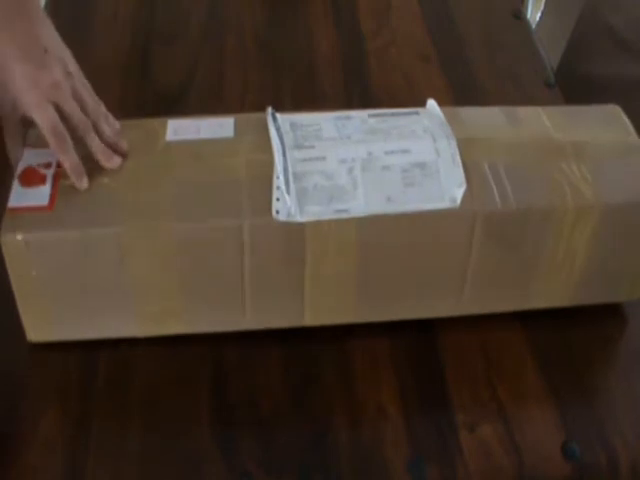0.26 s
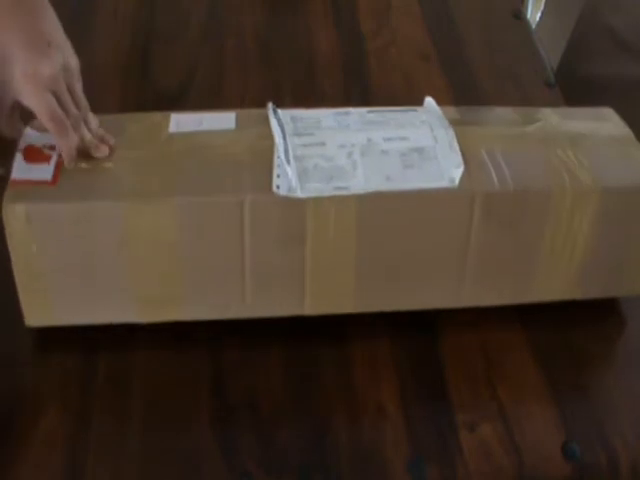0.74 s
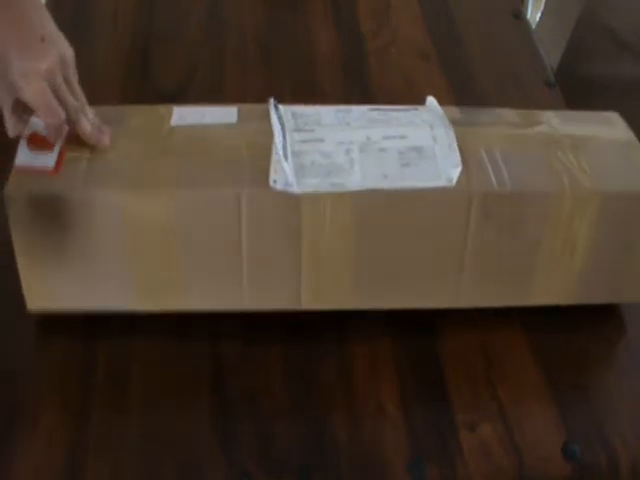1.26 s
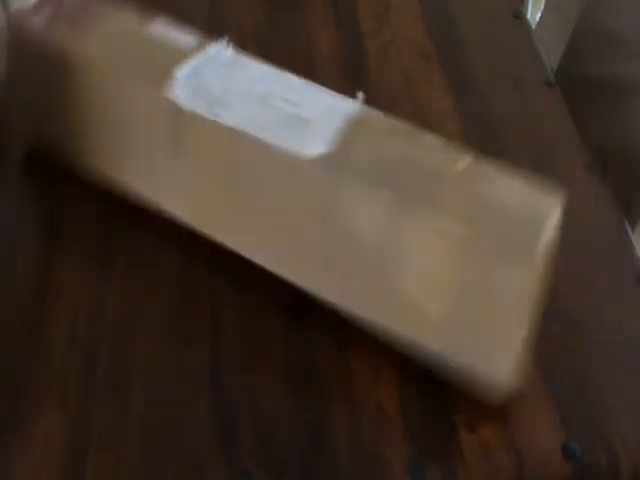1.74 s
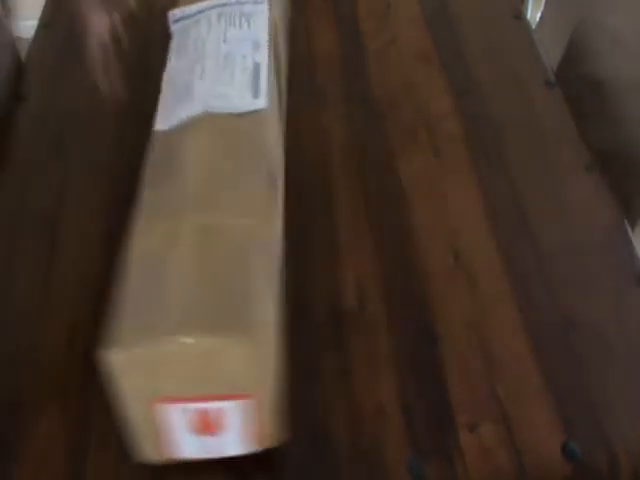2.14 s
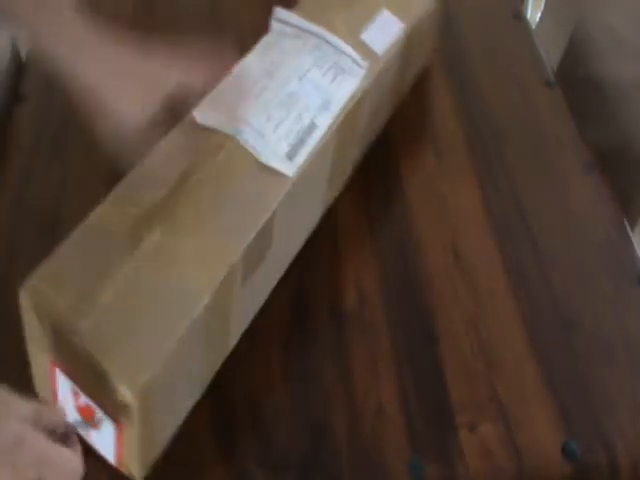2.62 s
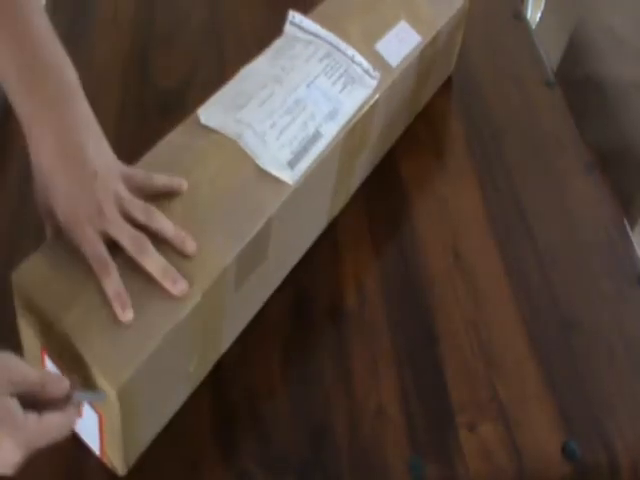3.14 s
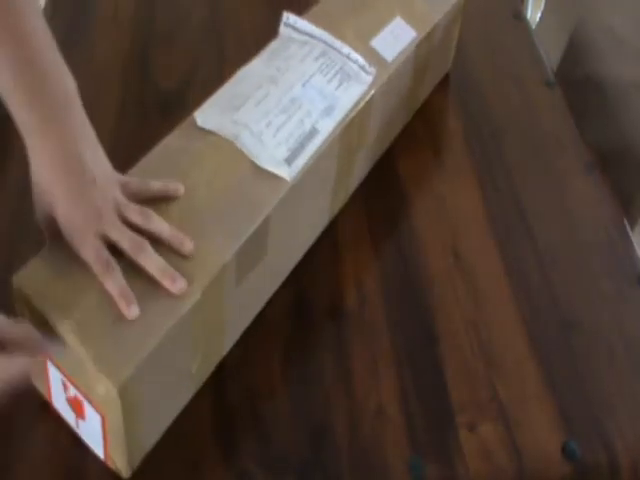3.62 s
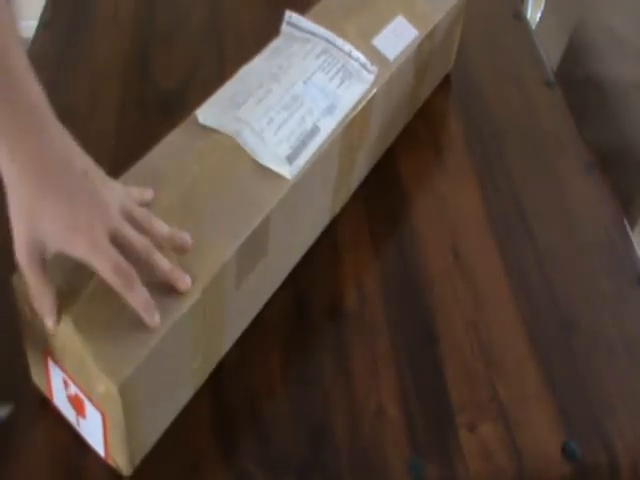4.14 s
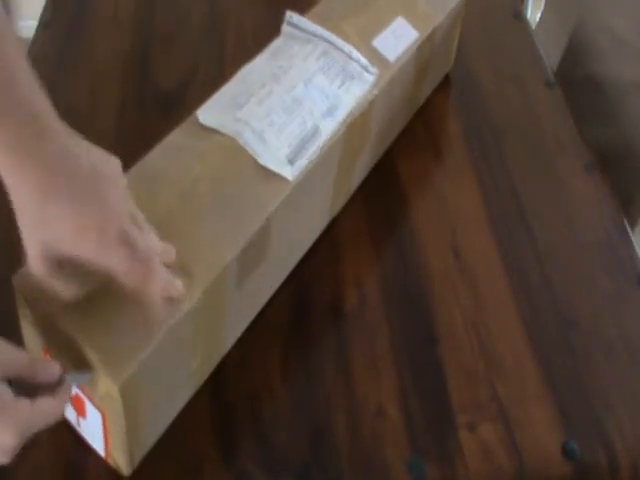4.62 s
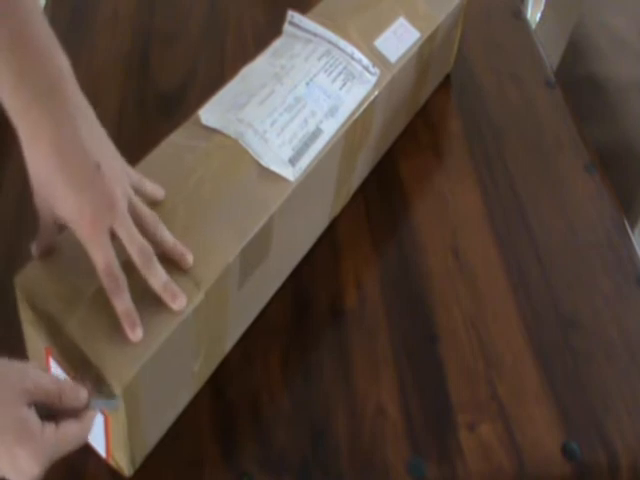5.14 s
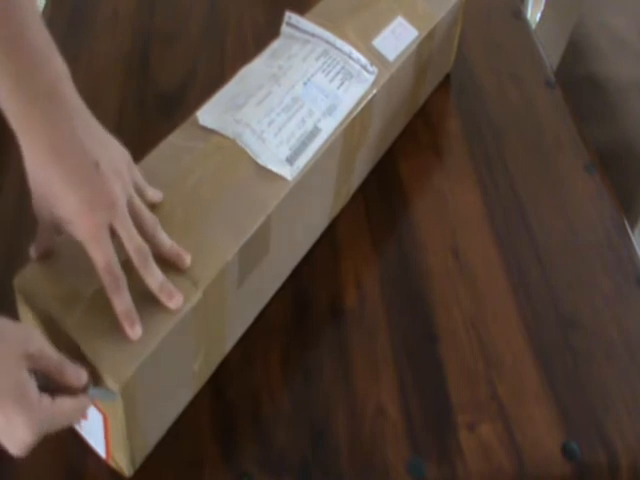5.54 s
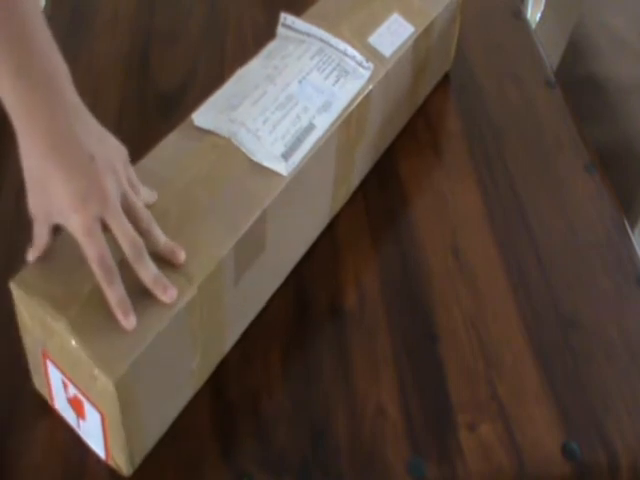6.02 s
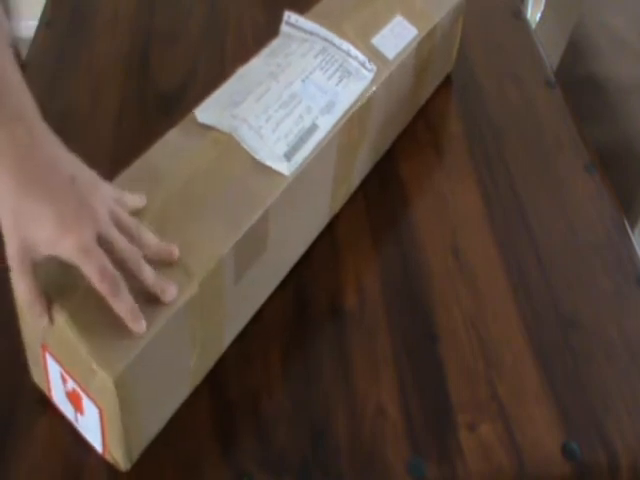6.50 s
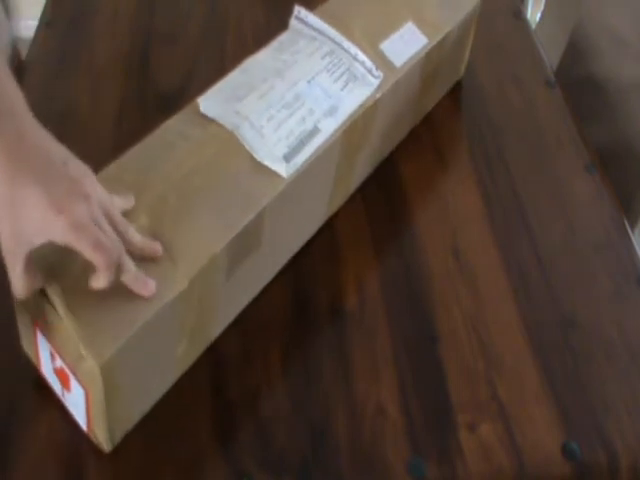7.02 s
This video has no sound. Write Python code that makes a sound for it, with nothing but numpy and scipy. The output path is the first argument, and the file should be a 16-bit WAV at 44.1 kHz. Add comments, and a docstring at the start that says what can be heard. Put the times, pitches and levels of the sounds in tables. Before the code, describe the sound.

A blade picks and rips packing tape on a cardboard box, with sharp snaps, hollow knocks and a slide across a wooden table.

```python
"""A long cardboard parcel is opened on a wooden table in a small, hard, faintly humming room.
First a blade picks at the taut packing tape, which snaps and scrapes. At 1 s a short rip crackles by
stick-slip, and its jerks make the hollow box drone. The box is swung round, hissing and juddering on the
wood, and set down with a knock. A second rip follows at 3.5 s and a third at 5.7 s, where the blade
springs free and twangs. At 7 s a flap pops loose."""
import sys
import numpy as np
from scipy import signal
from scipy.fft import rfft, irfft, next_fast_len
from scipy.io import wavfile
from scipy.ndimage import map_coordinates

SR = 44100
rng = np.random.default_rng(int(sys.argv[2]) if len(sys.argv) > 2 else 0)


def int16_out(signal):
    """Quantize to a 16-bit WAV file."""
    q = np.round(np.clip(np.atleast_2d(signal).T, -1, 1) * 32767)
    wavfile.write(sys.argv[1], SR, q.astype(np.int16))


N = 320166
TIME = np.arange(N) / SR

# Ripping strokes, with levels relative within each layer and the gliding resonance of the freed strip:
# start_s, length_s, crackle_db, wall_db, cavity_db, stall_db, swell_db, drone_hz, first_hz, last_hz
RIP_STROKES = [(1.05, 0.110, -25.5, -26, -20, 1, 5.5, 199, 10000, 8500),
               (3.54, 0.21, -24, -26, -25.5, 1.5, 4.5, 189, 6900, 3600),
               (5.734, 0.245, -24.5, -26, -26.5, 13.5, 6.5, 145, 4500, 4500)]
# Tape snapping as it is picked, bitten or freed: start_s, peak_db, resonance_hz, spray_db
TAPE_SNAPS = [(0.1057, -14.5, 8600, -19), (0.123, -20.5, 9000, 2), (0.2651, -11, 7260, -19),
              (0.388, -26.5, 2340, 2), (0.4763, -9, 5100, -15), (0.496, -32, 6070, 3),
              (0.522, -17.5, 10000, -8), (0.613, -24, 6660, -14), (0.7917, -18, 6000, -3),
              (0.9768, -17.5, 8400, -20), (1.0568, -10.5, 5200, 4), (1.0888, -9.5, 8540, -12),
              (1.165, -13, 5800, -8), (1.741, -15, 3040, 4), (1.8254, -12.5, 6900, -10.5),
              (3.171, -33, 4800, -6), (3.4259, -26.5, 6650, -18), (3.499, -13.5, 7240, 0),
              (3.546, -9, 3080, 0), (3.7641, -9, 3540, 15), (4.137, -35, 3940, -7),
              (4.2888, -12, 3610, -24.5), (4.4302, -12.5, 3600, -13), (4.672, -28.5, 2500, -12),
              (4.801, -30.5, 6000, -10), (4.9166, -26.5, 4500, -19), (5.704, -22, 6950, -9),
              (5.736, -26, 4000, 0), (5.771, -7.5, 6700, -16), (5.845, -7, 2500, 0), (6.01, -12, 3020, 1),
              (6.021, -21, 2640, -6), (6.032, -14.5, 2700, -1), (6.2395, -28.5, 7750, -13),
              (6.358, -32, 4900, -23), (6.393, -33.5, 1500, -10), (7.0144, -14.5, 1410, 12),
              (7.248, -28, 9370, -18)]
# Blade dragged over taut tape: start_s, length_s, level_db, resonance_hz
BLADE_SCRAPES = [(0.12, 0.071, -43.5, 8900), (0.487, 0.018, -34, 5840), (0.757, 0.2, -38.5, 5300),
                 (2.382, 0.083, -35.5, 4600), (2.664, 0.033, -41.5, 4640), (3.179, 0.03, -47.5, 5400),
                 (3.51, 0.031, -40, 7360), (3.698, 0.057, -28.5, 4050), (4.531, 0.051, -42, 1780),
                 (5.857, 0.092, -30, 4570), (6.675, 0.01, -47, 4240)]
# Blade springing free: start_s, gain_db
BLADE_TWANGS = [(5.739, -37.5), (6.012, -40), (6.021, -30.5)]
# Knocks on the panels of the box: start_s, level_db, pitch_hz, t60_s, relative_rattle_db
BOX_KNOCKS = [(0.032, -16.5, 175, 0.018, -19), (0.034, -28, 620, 0.016, -22),
              (0.977, -29.5, 357, 0.036, -7), (1.091, -10.5, 350, 0.019, -24),
              (1.117, -15.5, 220, 0.1, -22), (1.163, -11.5, 220, 0.049, -12),
              (1.570, -20.5, 190, 0.025, -25), (1.704, -9, 232, 0.018, -26), (1.741, -8, 470, 0.011, -15.5),
              (1.956, -26, 140.5, 0.36, -22), (2.2652, -4.5, 244, 0.022, -40),
              (2.269, -16.5, 477, 0.091, -19), (2.284, -11, 393, 0.057, -15),
              (2.325, -13.5, 304, 0.05, -21), (3.696, -22, 119, 0.1, -22), (3.717, -17.5, 330, 0.11, -19),
              (3.985, -22, 540, 0.0048, -21), (4.287, -25, 510, 0.026, -17), (4.301, -26, 450, 0.12, -7),
              (4.427, -27.5, 603, 0.023, -15), (4.548, -19, 200, 0.031, -10),
              (4.648, -18.5, 375, 0.006, -24), (4.697, -19.5, 292, 0.01, -17),
              (5.845, -19.5, 1010, 0.058, -12), (6.011, -10.5, 270, 0.021, -22),
              (6.03, -21, 400, 0.047, -23), (6.392, -28.5, 634, 0.015, -9), (6.586, -20, 300, 0.041, -13),
              (7.0135, -7, 352.6, 0.084, -15.5), (7.032, -10, 285, 0.028, -16),
              (7.05, -22, 760, 0.023, -14)]
# Level of the friction hiss, from the box sliding and then a hand rubbing it: time_s, level_db
FRICTION_LEVEL = [(1.47, -54), (1.55, -36.5), (1.734, -35), (1.738, -32), (2.156, -41.5), (2.3, -39.5),
                  (2.346, -41.5), (2.42, -33.5), (2.534, -41.5), (2.692, -44), (3.0, -59)]
# Edge of the box catching on the wood: start_s, length_s, relative_db
EDGE_JUDDERS = [(1.695, 0.059, -20), (1.932, 0.1, -32), (2.137, 0.022, -33)]
# Hand brushing over tape and card: start_s, length_s, relative_db
HAND_RUBS = [(0.0, 0.068, -40.5), (0.285, 0.53, -45.5), (0.815, 0.23, -48), (1.031, 0.03, -31),
             (1.243, 0.32, -44.5), (3.13, 0.041, -52), (3.843, 0.15, -46), (4.12, 0.11, -50.5),
             (4.529, 0.18, -43.5), (6.567, 0.014, -40.5), (6.446, 0.64, -52.5), (7.008, 0.011, -36.5)]

# Normal modes of box and blade: pitch_hz, relative_db, t60_s
BOX_MODES = [(91.5, -21, .10), (137.2, -10, 0.21), (179, -41, 0.69), (212.7, -2, 0.089), (275.5, -1, 0.068),
             (331, 2.5, 0.068), (392, 5, 0.056), (459.4, 0, 0.13), (590, 7.5, 0.026), (717, 0, 0.016),
             (840, -12, 0.076), (1132, 1.5, 0.032), (1392, -6.5, 0.071), (1854, -4, 0.079),
             (2250, -43, .04)]
BLADE_MODES = [(2070, -18, 0.11), (2250, -1, 0.092), (2290, 5.5, 0.063), (2470, -1, 0.11), (2560, 1, 0.11),
               (2760, -9, 0.17), (2950, -4, 0.17), (3000, -13, 0.14)]
# Spectral shapes of the noises: frequency_hz, relative_db
TAPE_SPECTRUM = [(400, -27.5), (900, 10), (1500, 8.5), (2300, 5.5), (3100, 2), (4700, 2), (7000, 2),
                 (10000, 0.5), (13000, -2.5), (16000, -12)]
SNAP_SPECTRUM = [(300, 0.5), (1200, 10), (3000, 5), (5000, 7), (8500, 7.5), (12000, 6.5), (16000, -2)]
FRICTION_SPECTRUM = [(400, -19), (1000, -1.5), (1800, -1), (3000, -2.5), (5000, -1), (9000, -1.5),
                     (13000, -5), (16000, -14)]
RUMBLE_SPECTRUM = [(40, -23), (80, -14.5), (130, 1), (190, -2.5), (280, 3), (450, -2), (700, -8),
                   (1200, -27.5), (2500, -74)]
SKIN_SPECTRUM = [(200, 15), (1200, 4), (2600, 1), (4500, 2.5), (6500, 0.5), (9500, 1), (13000, -5),
                 (16000, -7.5)]
AIR_SPECTRUM = [(18, -21), (31, -38), (48, -26), (70, -6), (130, -3.5), (175, -5.5), (230, -4.5), (335, -4),
                (520, -8.5), (1000, -15), (1900, -25), (2500, -22.5), (3400, -30), (16000, -37)]

# First echo off a near hard surface, shifting as the hands move: time_s, delay_s
ECHO_PATH = [(0.5, .0079), (3.5, .0084), (4.3, .00805), (4.5, .00805), (5.8, .0084)]
# Reverberation time of the room: frequency_hz, t60_s
ROOM_DECAY = [(100, 0.23), (300, 0.59), (1000, 0.37), (2500, 0.57), (6000, 0.43), (14000, 0.22)]
# Stereo width of the reverberation and of the rush of air: frequency_hz, side_to_mid_db
TAIL_SPREAD = [(250, -13), (1000, -4), (12000, -1)]
AIR_SPREAD = [(60, -32), (180, -26), (550, -10.5), (1650, -2), (4970, -3.5), (15000, -5)]
# Phase between the two microphone ports: frequency_hz, left_lead_rad
LEFT_LEAD = [(50, .7), (130, 1.0), (340, 1.0), (650, .7), (1500, .25), (8000, .18), (13000, .4)]
# Balance between the ports: frequency_hz, left_to_right_db
LEFT_BALANCE = [(60, -6), (110, -0.5), (200, -0.5), (380, -0.11), (700, 0.5), (1290, -0.5), (2380, 0.3),
                (4400, 0.82), (8120, 0.59), (15000, 3)]
# Hum and faint whine in the room: pitch_hz, rms_db
HUM_TONES = [(47.5, -56), (176, -60), (2519, -69.5), (3149, -80)]


def tape_rips(tape_mix_db=-3.5, wall_mix_db=-1.5, cavity_mix_db=-2.5):
    """Forced vibration: the jerks of the parting tape drive the strip, the walls and the air inside."""
    force = stick_slip(per_s=2200, spread_db=4, clump_db=2, clumps_per_s=260, hiss_db=-3.5)
    box = ring(BOX_MODES)
    drone, tape_drive, wall_drive, glide = 0, 0, 0, []
    for (start, length, crackle_db, wall_db, cavity_db,
         stall_db, swell_db, drone_hz, first_hz, last_hz) in RIP_STROKES:
        # a stroke bites at once, stalls for a moment, runs on and dies away
        progress = (TIME - start) / length
        stall = np.exp(-((progress - 0.17) / 0.082) ** 2)
        pull = gesture(start, length, attack_s=0.0041, t60_s=0.25) * from_db(-stall_db * stall)
        tape_drive += from_db(tape_mix_db + crackle_db) * pull
        wall_drive += from_db(wall_mix_db + wall_db) * pull
        # the cavity swells as the slit opens
        still_shut = np.clip(1 - progress, 0, 1)
        cavity_drive = from_db(cavity_mix_db + cavity_db - swell_db * still_shut ** 2) * pull
        drone += through(force * cavity_drive, unit_energy(band(box, drone_hz, octaves=0.81)))
        glide += [(start, first_hz), (start + length, last_hz)]
    rasp = strip_rasp(force, strip_hz=at_times(glide))
    crackle = through(rasp * tape_drive, colour(TAPE_SPECTRUM))
    walls = through(force * wall_drive, unit_energy(band(box, hz=710, octaves=2)))
    return crackle + walls + drone


def stick_slip(per_s, spread_db, clump_db, clumps_per_s, hiss_db):
    """Stick-slip friction: clumps of tiny, uneven releases over smooth hiss give a force of rms 1."""
    sizes = from_db(spread_db * np.minimum(rng.exponential(1, N), 4)) * rng.choice([-1, 1], N)
    releases = sizes * (rng.random(N) < per_s / SR)
    force = releases / releases.std() + from_db(hiss_db) * rng.standard_normal(N)
    force *= from_db(clump_db * drift(clumps_per_s))
    return force / force.std()


def strip_rasp(force, strip_hz, resonance_db=1.5, width_octaves=0.9, flutter_db=1.5, flutter_per_s=45):
    """Variable resonance: a broad peak glides with the free strip, and the bands flutter as it flexes."""
    size = next_fast_len(N)
    spectrum, hz = rfft(force, size), np.fft.rfftfreq(size, 1 / SR)
    centres_hz = np.geomspace(800, 15000, 16)
    out = np.zeros(N)
    for centre_hz, share in zip(centres_hz, np.eye(len(centres_hz))):
        part = irfft(spectrum * at_hz(np.c_[centres_hz, share], hz), size)[:N]
        nearness = np.exp(-(np.log2(centre_hz / strip_hz) / width_octaves) ** 2)
        out += part * from_db(resonance_db * nearness + flutter_db * drift(flutter_per_s))
    return out


def tape_snaps(resonance_db=10, spray_t60_s=0.009, size=1500):
    """Sudden release of tension: taut film clicks and sprays small cracks through a broad resonance."""
    out, tick = np.zeros(N), colour(SNAP_SPECTRUM)
    for start, peak_db, hz, spray_db in TAPE_SNAPS:
        cracks = from_db(spray_db - 60 * TIME[:size] / spray_t60_s) * rng.standard_normal(size)
        cracks[0] = 1  # the leading click
        cracks += from_db(resonance_db) * band(cracks, hz, octaves=0.99, order=1)
        snap = signal.fftconvolve(cracks, tick)[:size]
        add(out, start, from_db(peak_db) * snap / np.abs(snap).max())
    return out


def blade_scrapes():
    """Resonant filtering: fine slips of the blade swell and fade in one resonance of the tape."""
    out = np.zeros(N)
    force = stick_slip(per_s=3000, spread_db=0, clump_db=5, clumps_per_s=120, hiss_db=6)
    for start, length, level_db, hz in BLADE_SCRAPES:
        first, size = round(start * SR), round(length * SR)
        scrape = band(force[first:first + size], hz, octaves=0.69, order=1)
        swell = np.sin(np.linspace(0, np.pi, size))
        add(out, start, from_db(level_db) * swell * scrape / scrape.std())
    return out


def blade_twangs():
    """Free vibration: the thin blade rings in its modes when the tape lets it go."""
    out = np.zeros(N)
    for start, gain_db in BLADE_TWANGS:
        add(out, start, from_db(gain_db) * ring(BLADE_MODES))
    return out


def box_knocks(body_db=-7.5, rattle_t60_s=0.11, size=12000):
    """Impact excitation: a struck panel swings, stirs nearby box modes and rattles flaps and tape."""
    thuds, rattle = np.zeros((2, N))
    box, t = ring(BOX_MODES), TIME[:size]
    for start, level_db, hz, t60_s, rattle_db in BOX_KNOCKS:
        panel = np.sin(2 * np.pi * hz * t) * from_db(-60 * t / t60_s)
        panel = high_pass(panel, hz / 4)  # a panel radiates little far below its own pitch
        body = band(box, hz, octaves=2.33)
        add(thuds, start, from_db(level_db) * (panel + from_db(body_db) * body / np.abs(body).max()))
        rattle_decay = from_db(level_db + rattle_db - 60 * t / rattle_t60_s)
        add(rattle, start, rattle_decay * rng.standard_normal(size))
    return thuds + band(rattle, hz=1760, octaves=1.07, order=1)


def box_friction(rumble_db=-3.5):
    """Sliding friction: card hisses and rumbles on wood, then under a hand; judders swell the rumble."""
    force = stick_slip(per_s=5000, spread_db=3, clump_db=1, clumps_per_s=110, hiss_db=-2)
    friction = level_curve(FRICTION_LEVEL)
    judder = sum(from_db(db) * gesture(start, length, attack_s=0.032, t60_s=0.3)
                 for start, length, db in EDGE_JUDDERS)
    hiss = through(force * friction, colour(FRICTION_SPECTRUM))
    rumble = through(force * np.hypot(friction, judder), colour(RUMBLE_SPECTRUM))
    return hiss + from_db(rumble_db) * rumble


def brushing(mix_db=-3, rustle_db=-41, db_per_snap_db=0.56):
    """Friction noise: light hand strokes and a rustle at each snap add in power, with fine crackles."""
    force = stick_slip(per_s=700, spread_db=4, clump_db=0.6, clumps_per_s=70, hiss_db=-4.5)
    hand = sum(from_db(db) * gesture(start, length, attack_s=0.021, t60_s=0.21)
               for start, length, db in HAND_RUBS)
    # a faint rustle swells just before each snap and trails off, louder after a hard one
    rustle = sum(from_db(rustle_db + db_per_snap_db * db) * gesture(start, 0, attack_s=0.017, t60_s=0.73)
                 for start, db, _, _ in TAPE_SNAPS)
    return from_db(mix_db) * through(force * np.hypot(hand, rustle), colour(SKIN_SPECTRUM))


def room(x, echo_db=-8.5, moves_per_s=12):
    """Reflection: direct sound, one echo, then a diffuse tail that changes as hands and box move."""
    treble = high_pass(x, 1200)  # a small surface returns only short waves
    echo = from_db(echo_db) * map_coordinates(treble, [(TIME - at_times(ECHO_PATH)) * SR], order=3)
    position = 2 * drift(moves_per_s)
    return x + echo + reverberation(x * np.cos(position)) + reverberation(x * np.sin(position))


def reverberation(x, bass_db=-4, treble_db=-9, build_s=0.0059, size=32000):
    """Diffuse field of one source position: each band builds and decays, wider in the treble."""
    t, edges_hz = TIME[:size], np.geomspace(90, 18000, 11)
    response = np.zeros((2, size))
    for low, high, wet_db in zip(edges_hz, edges_hz[1:], np.linspace(bass_db, treble_db, 10)):
        hz = np.sqrt(low * high)
        mid, side = band(rng.standard_normal((2, size)), hz, np.log2(high / low))
        decay = unit_energy(from_db(-60 * t / at_hz(ROOM_DECAY, hz)) * (1 - np.exp(-t / build_s)))
        width = from_db(at_hz(TAIL_SPREAD, hz))
        response += from_db(wet_db) * decay * (mid + width * side * [[1], [-1]])
    return np.array([through(x, channel) for channel in response])


def near_field(x):
    """Near field: sound from close by reaches two microphone ports with unequal phase and level."""
    size = next_fast_len(N + 4096)
    hz, half = np.fft.rfftfreq(size, 1 / SR), np.array([[.5], [-.5]])
    response = np.exp(1j * half * at_hz(LEFT_LEAD, hz)) * from_db(half * at_hz(LEFT_BALANCE, hz))
    return irfft(rfft(x, size) * response, size)[:, :N]


def background(air_db=-45):
    """Ambient noise: a steady rush of air, and a hum that wavers by phase modulation."""
    mid, side = (through(white, colour(AIR_SPECTRUM)) for white in rng.standard_normal((2, N)))
    width = from_db(at_hz(AIR_SPREAD, np.fft.rfftfreq(N, 1 / SR)))
    side = irfft(rfft(side) * width, N)
    hum = sum(from_db(db) * np.sqrt(2) * np.sin(2 * np.pi * hz * TIME + 3 * drift(per_s=7.2))
              for hz, db in HUM_TONES)
    return from_db(air_db) * (mid + side * [[1], [-1]]) + hum


def ring(modes, size=12000):
    """Modal superposition: the response to one push is a sum of damped cosines."""
    hz, level_db, t60_s = np.transpose(modes)[:, :, None]
    t = TIME[:size]
    return np.sum(from_db(level_db - 60 * t / t60_s) * np.cos(2 * np.pi * hz * t), axis=0)


def gesture(start, length, attack_s, t60_s):
    """Envelope: a linear rise up to the start, a hold, then exponential decay."""
    attack = np.clip(1 + (TIME - start) / attack_s, 0, 1)
    return attack * from_db(-60 * np.clip((TIME - start - length) / t60_s, 0, 2))


def level_curve(points, fade_s=0.0045):
    """Envelope from a table of levels, with exponential decay outside its span."""
    outside_s = np.abs(TIME - np.clip(TIME, points[0][0], points[-1][0]))
    return from_db(at_times(points)) * np.exp(-np.minimum(outside_s / fade_s, 20))


def drift(per_s):
    """Random modulation: Gaussian values joined by straight lines."""
    return np.interp(TIME * per_s, np.arange(4000), rng.standard_normal(4000))


def colour(points, size=4096):
    """Minimum phase: folding the cepstrum gives a causal response with the given spectral shape."""
    magnitude = from_db(at_hz(points, np.fft.rfftfreq(size, 1 / SR)))
    cepstrum = irfft(np.log(magnitude))
    cepstrum[1:size // 2] *= 2
    cepstrum[size // 2 + 1:] = 0
    return unit_energy(irfft(np.exp(rfft(cepstrum))))


def band(x, hz, octaves, order=2):
    """Band-pass filtering round a centre frequency."""
    edges_hz = np.clip(hz * 2 ** (np.array([-.5, .5]) * octaves), [15, 30], [17000, 20000])
    return signal.sosfilt(signal.butter(order, edges_hz, "band", fs=SR, output="sos"), x)


def high_pass(x, hz):
    """First-order filtering: the bass falls by 6 dB an octave."""
    return signal.sosfilt(signal.butter(1, hz, "high", fs=SR, output="sos"), x)


def through(x, response):
    """Convolution with an impulse response."""
    return signal.oaconvolve(x, response)[:N]


def unit_energy(x):
    """Energy normalisation: white noise keeps its level through the scaled response."""
    return x / np.sqrt(np.sum(x ** 2, axis=-1, keepdims=True) + 1e-20)


def at_hz(points, hz):
    """Interpolation on a log-frequency axis."""
    known_hz, values = np.transpose(points)
    return np.interp(np.log(np.maximum(hz, 1)), np.log(known_hz), values)


def at_times(points):
    """Linear interpolation in time."""
    return np.interp(TIME, *np.transpose(points))


def from_db(db):
    """Amplitude ratio of a level in decibels."""
    return 10 ** (np.asarray(db) / 20)


def add(track, start_s, sound):
    """Superposition of a sound on a track."""
    first = round(start_s * SR)
    track[first:first + len(sound)] += sound[:N - first]


def scene():
    """Superposition: all handling of the parcel sounds in one room, over its background."""
    opening = tape_rips() + blade_scrapes() + tape_snaps() + blade_twangs()
    handling = box_friction() + brushing() + box_knocks()
    return near_field(room(opening + handling)) + background()


def record(dry):
    """Band limiting: a steep low-pass removes the treble above 16 kHz."""
    return signal.sosfilt(signal.ellip(10, .1, 80, 16000, fs=SR, output="sos"), dry)


dry = scene()
out = record(dry)
int16_out(out)
```